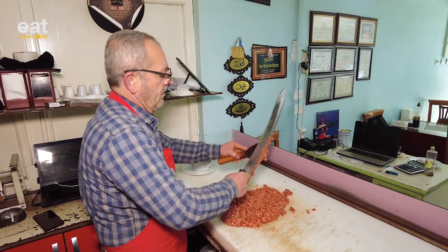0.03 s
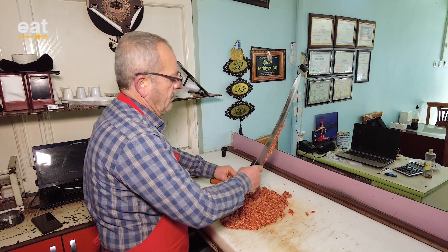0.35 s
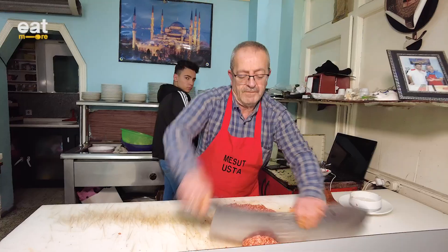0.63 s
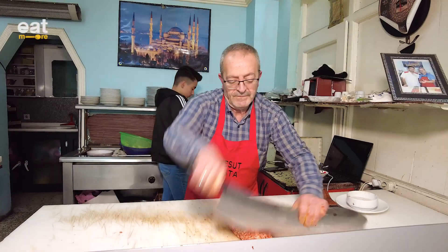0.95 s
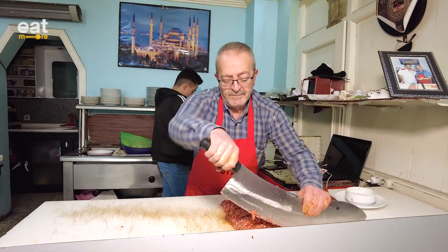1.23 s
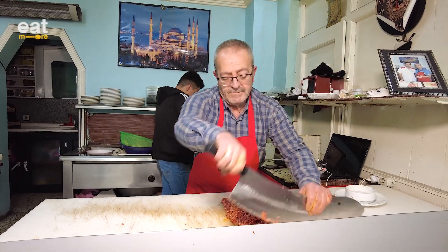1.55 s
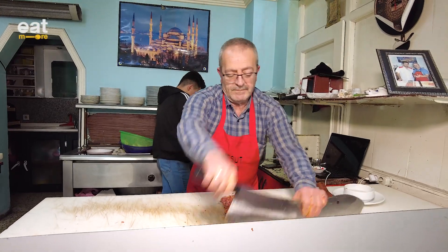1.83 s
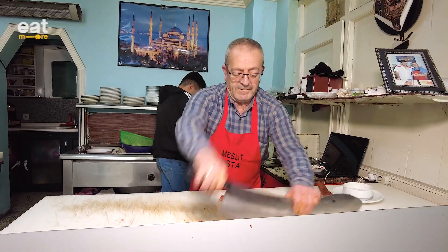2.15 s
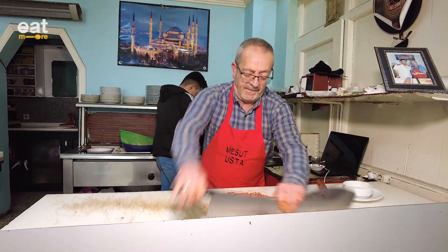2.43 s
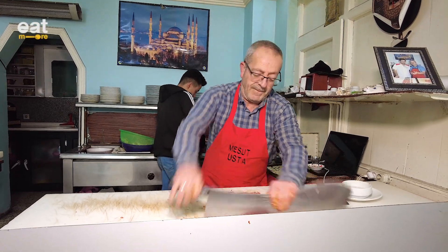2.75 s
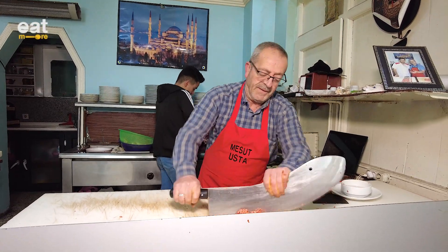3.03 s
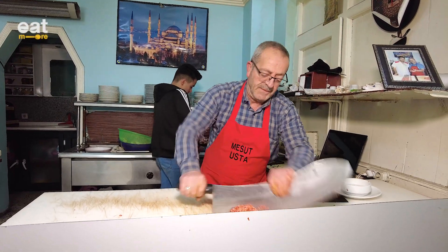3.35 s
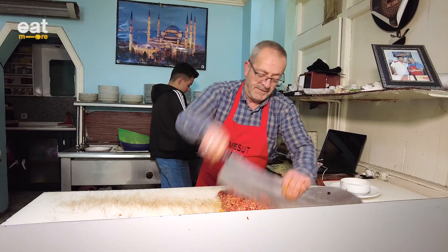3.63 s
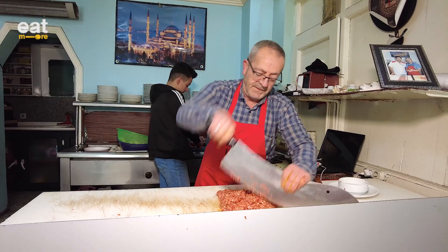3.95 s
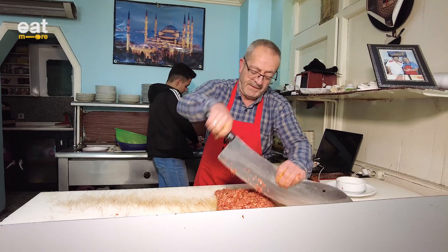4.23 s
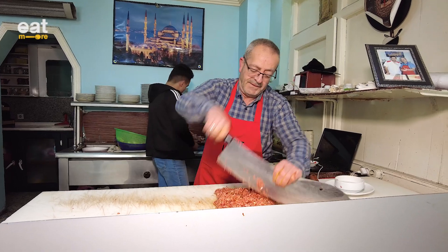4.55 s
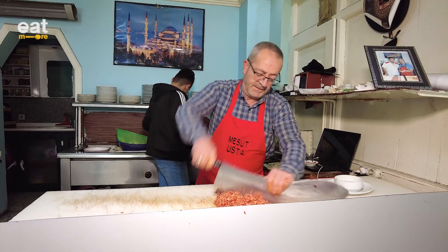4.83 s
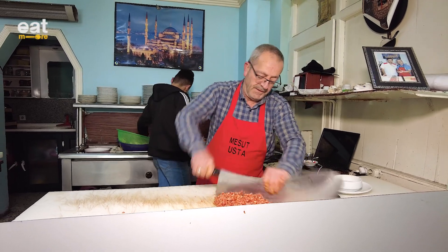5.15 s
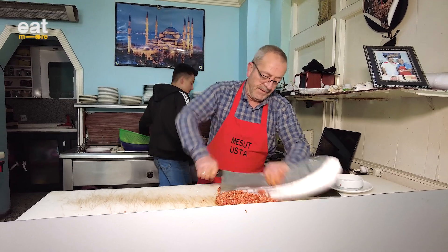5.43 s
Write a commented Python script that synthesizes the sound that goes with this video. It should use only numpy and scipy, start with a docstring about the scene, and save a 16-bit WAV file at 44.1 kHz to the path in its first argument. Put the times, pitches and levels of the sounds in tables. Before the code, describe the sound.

A short metallic scrape and clink, followed by steady cleaver knocks and moist crunches as meat is minced on a board.

```python
"""A long curved cleaver rocks through minced meat, three times a second. Each downstroke and return
crushes the wet meat and knocks the edge on a thick board, which thumps the counter under it.
Before the mincing, the blade is whetted on a steel and leaves it with a clink.
The small hard-walled kitchen adds a short tail and a low hum."""
import sys
import numpy as np
from scipy import signal
from scipy.fft import rfft, irfft
from scipy.io import wavfile
from scipy.ndimage import uniform_filter1d

SR = 44100
rng = np.random.default_rng(int(sys.argv[2]) if len(sys.argv) > 2 else 0)


def digitize_waveform(pressure):
    """Quantize a signal to 16-bit integers and store it at the path in sys.argv[1].

    Rows of a 2-D input are taken as channels; values are limited to [-1, 1].
    """
    field = np.atleast_2d(pressure).T
    bounded = np.clip(field, -1, 1)
    quanta = np.round(bounded * 32767).astype(np.int16)
    wavfile.write(sys.argv[1], SR, quanta)


N = 246959
T = np.arange(N) / SR
MINCE_START_S = .607

# Modes of board and counter. Each row: frequency in Hz, relative level in dB, t60 in seconds.
COUNTER_MODES = [(37.5, -9.5, 1), (47.5, -3.5, 0.68), (83.8, -8, 0.34), (90.6, -5.5, 0.39),
                 (105.66, 2, 0.29), (152.2, 3, 0.091), (208, -12, 0.12), (237.5, -2, 0.14), (283, -5, .15),
                 (339, -8, 0.1), (353.6, 5, 0.04), (467, 1, 0.021)]
# Modes of the steel blade. Each row: frequency in Hz, relative level in dB, t60 in seconds.
BLADE_MODES = [(1324, -5, .22), (1464, -4, .25), (2056, -3, .22), (3542, -10, .25), (4043, -7, .45),
               (4382, -3, .15), (4603, -1, .25), (5238, -2, .7), (7149, 3, .2), (7547, -6, .18),
               (7849, -4, .12)]
# Crunch spectrum. Each row: frequency in Hz, relative gain in dB.
CRUNCH_SPECTRUM = [(50, 5.5), (90, 5), (250, 5), (450, 4.5), (720, -12), (1050, -5.5), (1400, -19),
                   (1800, -25), (2300, -20), (3200, -30.5), (6000, -32.5), (12000, -54.5)]
# The blade lands and rolls along its curved edge.
# Each row: landing in seconds, roll time in seconds, thump in dB, crunch in dB.
DOWN_STROKES = [(0.7633, 0.02, -12.5, -34), (1.1086, 0.019, -15.5, -28.5), (1.444, 0.016, -15, -29.5),
                (1.7733, .017, -15, -28.5), (2.1022, 0.018, -14, -28.5), (2.427, .0175, -12.5, -27),
                (2.772, 0.0063, -7, -23.5), (3.1, 0.015, -9.5, -25), (3.447, .014, -14, -27.5),
                (3.7872, 0.014, -18, -29), (4.1301, 0.014, -14, -26.5), (4.477, .005, -15.5, -29),
                (4.8265, .021, -22, -28), (5.1579, 0.019, -18, -28), (5.5112, 0.019, -16.5, -28)]
# The blade rocks back with a dull knock, then settles on its edge.
# Each row: start in seconds, roll time in seconds, knock in dB, settling in dB.
RETURN_STROKES = [(.832, .0195, -29, -15), (1.1816, .0217, -16, -14.5), (1.532, .016, -21, -18.5),
                  (1.8677, .024, -20, -21.5), (2.197, .0235, -19, -18.5), (2.5176, .0157, -12.5, -14),
                  (2.8439, .0164, -6.5, -27), (3.1786, .0125, -9.5, -14.5), (3.5156, .019, -22.5, -13),
                  (3.8553, .0195, -19, -17.5), (4.205, .0173, -17, -12), (4.548, .018, -28, -14.5),
                  (4.895, .019, -29, -20), (5.245, .043, -19.5, -19)]


def undb(db):
    """Decibels to gain."""
    return 10 ** (np.asarray(db) / 20)


def unit(x):
    """Scale to rms 1."""
    return x / np.sqrt(np.mean(x ** 2))


def colour(x, spectrum):
    """Minimum-phase filter of unit energy, shaped by (Hz, dB) points."""
    size = 4096
    hz, db = np.transpose(spectrum)
    gain = undb(np.interp(np.log(np.fft.rfftfreq(size, 1 / SR) + 1), np.log(hz), db))
    cepstrum = irfft(np.log(gain))
    cepstrum[1:size // 2] *= 2
    cepstrum[size // 2 + 1:] = 0
    response = irfft(np.exp(rfft(cepstrum)))
    return signal.fftconvolve(x, response / np.linalg.norm(response))[:N]


def ring(x, modes):
    """Drive decaying modes; the response has unit energy."""
    t = T[:SR]
    response = sum(undb(db - 60 * t / t60) * np.sin(2 * np.pi * hz * t) for hz, db, t60 in modes)
    return signal.fftconvolve(x, response / np.linalg.norm(response))[:N]


def grains(per_s, spread_db):
    """Random tiny snaps of uneven size, rms 1."""
    size = undb(spread_db * np.clip(rng.standard_normal(N), -2, 2))
    return unit((rng.random(N) < per_s / SR) * size * rng.choice([-1, 1], N))


def swells(peaks_s, peaks_db, rise_s, fall_s):
    """Envelope with an exponential rise and fall around each peak."""
    power = np.zeros(N)
    for s, db in zip(peaks_s, peaks_db):
        near = slice(max(int((s - .5) * SR), 0), int((s + .5) * SR))
        t = T[near] - s
        power[near] += (undb(db) * np.exp(np.minimum(t / rise_s, -t / fall_s))) ** 2
    return np.sqrt(power)


def chirp(hz, fall_s):
    """Brief rough tone of unsteady pitch; rises twice as fast as it falls."""
    t = np.arange(-SR // 25, SR // 25) / SR
    jitter = unit(uniform_filter1d(rng.standard_normal(len(t)), size=int(SR / hz) + 1))
    phase = 2 * np.pi * np.cumsum(hz * (1 + .14 * jitter)) / SR
    return np.exp(np.minimum(2 * t, -t) / fall_s) * np.sin(phase)


def by_depth(s, rim_db, middle_db):
    """Level at time s as the blade works from the rim of the heap into its middle."""
    # Blade path. Each row: time in seconds, depth from 0 (rim) to 1 (middle).
    path = [(.7, 0.17), (2.2, 0), (3.3, 0.8), (5.5, 0.6)]
    depth = np.interp(s, *np.transpose(path))
    return np.interp(depth, (0, 1), (rim_db, middle_db))


def room_hum():
    """Low room noise, 3 dB louder during the mincing."""
    # Each row: frequency in Hz, relative gain in dB.
    spectrum = [(20, -14), (40, 6.5), (60, -1), (110, -10.5), (160, -14.5), (300, -18.5), (700, -26),
                (1200, -32.5), (2500, -38), (7000, -48), (10000, -59), (15500, -69.5)]
    return colour(rng.standard_normal(N), spectrum) * undb(np.where(T >= MINCE_START_S, -47, -50))


def kitchen(x, low_db=-7, high_db=-12, t60_s=.53, split_hz=600, first_echo_s=.0064):
    """Near walls return a short, bass-heavy tail; the echo pattern changes as the blade moves."""
    hop = SR // 10
    t = T[:SR // 2]
    onset = np.clip(t / first_echo_s - 1, 0, 1)
    x, out = np.pad(x, (0, 2 * hop)), np.zeros(N + SR)
    for start in range(0, N, hop):
        echoes = rng.standard_normal(len(t)) * onset * undb(-60 * t / t60_s)
        echoes /= np.linalg.norm(echoes)
        tail = 0
        for side, db in (("low", low_db), ("high", high_db)):
            band = signal.butter(1, split_hz, side, fs=SR, output="sos")
            tail = tail + undb(db) * signal.sosfilt(band, echoes)
        piece = signal.fftconvolve(x[start:start + 2 * hop] * signal.windows.cosine(2 * hop), tail)
        out[start:start + len(piece)] += piece
    return x[:N] + out[:N]


def pings():
    """Something small and metallic is touched lightly, twice."""
    # Each row: start in seconds, pitch in Hz, level in dB, t60 in seconds.
    touches = [(2.896, 9800, -54, .035), (2.914, 5780, -52, .07)]
    return sum((T >= s) * undb(db - 60 * np.abs(T - s) / t60) * np.sin(2 * np.pi * hz * (T - s))
               for s, hz, db, t60 in touches)


def wiping():
    """Between the first chops the flat of the blade swishes over the meat."""
    # Each row: peak time in seconds, level in dB.
    wipes = [(1.028, -60), (1.37, -58)]
    # Each row: frequency in Hz, relative gain in dB.
    spectrum = [(2000, -9.5), (4000, -7.5), (5200, 0), (6500, -8.5), (8000, -17.5), (15500, -33)]
    return colour(grains(6000, 2) * swells(*np.transpose(wipes), rise_s=.093, fall_s=.044), spectrum)


def counter_shudder():
    """The counter is still shuddering as the mincing comes in."""
    envelope = swells([MINCE_START_S], [-41], rise_s=.0035, fall_s=.2)
    shake = colour(grains(3300, .92) * envelope, CRUNCH_SPECTRUM)
    return shake + undb(-15.5) * ring(shake, COUNTER_MODES)


def counter_boom(force):
    """The counter booms most where it gives most under the blade."""
    # Each row: time in seconds, gain in dB.
    give = [(.85, 7), (1.3, 4), (2.3, 9), (3.1, -0.5), (3.8, 9.5), (4.35, 0.5), (4.9, 5), (5.5, -0.5)]
    return ring(force * undb(np.interp(T, *np.transpose(give))), COUNTER_MODES)


def whetting(detune=.022, wander_hz=12, clink_s=.413, bounce_s=.0063):
    """Steel slides on steel, then chatters briefly as the blade leaves it and rings."""
    # Whetting stroke. Each row: time in seconds, relative level in dB.
    stroke = [(0.0, -51), (0.03, -49.5), (0.086, -54), (0.12, -50), (0.172, -61), (0.248, -51),
              (0.346, -58.5), (0.4, -52.5), (0.41, -54)]
    # Steel and blade pressed together. Each row: frequency in Hz, relative level in dB, t60 in seconds.
    contact_modes = [(1463, -1.5, 0.21), (1980, 0, 0.061), (2525, 6.5, 0.058), (3164, 3.5, 0.078),
                     (3600, 9.5, 0.037), (5900, 6, 0.026), (7020, 7.5, 0.059), (9900, 5.5, 0.032)]
    # Each row of both: frequency in Hz, relative gain in dB.
    scrape_spectrum = [(500, -11), (1000, -31), (1500, 0.5), (3200, 0), (4500, 0.5), (7200, 0.5),
                       (9000, -4), (11000, -16), (13500, -16), (15500, -22)]
    clink_spectrum = [(600, -31), (1300, 9), (2100, 11), (2900, -7.5), (4500, 10), (6000, 3), (7300, 13.5),
                      (9000, -1), (15500, -21)]
    lift_off = np.clip((clink_s + .027 - T) / .0077, 0, 1)
    pressure = undb(np.interp(T, *np.transpose(stroke)) - 3) * lift_off
    rasp = grains(4400, 3) * pressure
    # The resonances wander as the contact travels along the blade.
    wander = unit(uniform_filter1d(rng.standard_normal(N), size=int(SR / wander_hz)))
    warped_s = T + detune * np.cumsum(wander) / SR
    singing = undb(-2) * np.interp(warped_s, T, ring(rasp, contact_modes))
    bounces = swells([clink_s, clink_s + bounce_s], [-32, -32], rise_s=.0012, fall_s=.0061)
    clink = colour(grains(9000, 1.1) * bounces, clink_spectrum)
    pluck = np.zeros(N)  # slipping off the tip plucks the free blade
    pluck[int(clink_s * SR)] = undb(-16)
    return colour(rasp, scrape_spectrum) + singing + clink + ring(pluck, BLADE_MODES)


def slicing(lead_s=.033):
    """Each downstroke first parts the top of the heap with a bright wet hiss."""
    # Each row: frequency in Hz, relative gain in dB.
    spectrum = [(1000, -9), (3000, -4.5), (7000, -0.5), (9000, -3), (11000, -13), (15500, -24)]
    s = np.transpose(DOWN_STROKES)[0] - lead_s
    envelope = swells(s, by_depth(s, -70.5, -55), rise_s=.006, fall_s=.043)
    return colour(grains(2500, 2.5) * envelope, spectrum)


def crush_peaks():
    """Hardest squeeze of each roll. Each row: time in seconds, crunch in dB, fizz in dB."""
    down = [(s + .45 * roll_s, crunch_db, crunch_db + by_depth(s, -26.5, -24.5))
            for s, roll_s, _, crunch_db in DOWN_STROKES]
    back = [(s + .75 * roll_s, -34, by_depth(s, -62, -58.5)) for s, roll_s, _, _ in RETURN_STROKES]
    return down + back


def squelches(pops=8, low_hz=1000, high_hz=8000, spread_s=.014, pop_s=.0065,
              groan_hz=1180, groan_s=.0095):
    """Pockets of juice squeeze out: a few loud squeaks, plus a groan and small pops in every stroke."""
    # Each row: peak time in seconds, pitch in Hz, level in dB, decay time in seconds.
    squeaks = [(1.772, 1300, -28, .004), (2.450, 2250, -33, .004), (2.539, 2280, -30, .003),
               (2.785, 1500, -30, .004), (2.785, 3700, -36, .003), (2.790, 2300, -30, .005),
               (3.126, 1450, -34, .005), (3.133, 2200, -33, .005)]
    # Groan of well-minced paste. Each row: time in seconds, level in dB.
    groan = [(.7, -58), (3.3, -43), (3.8, -36.5), (4.45, -38), (5.0, -48)]
    rows = list(squeaks)
    for strokes, lead_s, offset_db in ((DOWN_STROKES, .008, 0), (RETURN_STROKES, 0, -1.5)):
        for s in np.transpose(strokes)[0] - lead_s:
            rows.append((s, groan_hz, offset_db + np.interp(s, *np.transpose(groan)), groan_s))
    for s, _, fizz_db in crush_peaks():
        for when, pitch, size in rng.uniform(-.91, 1, (pops, 3)):
            hz = low_hz * (high_hz / low_hz) ** ((pitch + 1) / 2)
            db = fizz_db + 5 - 10 * pitch + 3 * size
            rows.append((s + spread_s * when, hz, db, pop_s))
    out = np.zeros(N + SR)
    for s, hz, db, fall_s in rows:
        tone = undb(db) * chirp(hz, fall_s)
        start = int(s * SR) - len(tone) // 2
        out[start:start + len(tone)] += tone
    return out[:N]


def crushing(blade_db=-19, rumble_db=-18):
    """Fibres snap and juice fizzes; the rolling blade rocks the counter and sings faintly."""
    # Each row: frequency in Hz, relative gain in dB.
    fizz_spectrum = [(700, 4), (1800, 8), (3000, -2.5), (5000, -3), (7200, 2), (9000, -11.5), (11000, -12),
                     (15500, -17)]
    s, crunch_db, fizz_db = np.transpose(crush_peaks())
    crunch = colour(grains(1100, 3.5) * swells(s, crunch_db, rise_s=.023, fall_s=.025), CRUNCH_SPECTRUM)
    fizz = colour(grains(1400, 4.2) * swells(s, fizz_db, rise_s=.018, fall_s=.015), fizz_spectrum)
    rumble = undb(rumble_db) * counter_boom(crunch)
    return crunch + rumble + fizz + undb(blade_db) * ring(fizz, BLADE_MODES)


def blows(touch_lead_s=.02, full_speed_s=.0074):
    """Edge meets board. Each row: time in seconds, thump in dB, tick in dB."""
    rows = []
    for s, roll_s, db, _ in DOWN_STROKES:
        speed_db = 20 * np.log10(min(roll_s / full_speed_s, 1))  # a short roll picks up less speed
        touch = (s - touch_lead_s, db + by_depth(s, -7.5, -7), -56)
        landing = (s, db, by_depth(s, -43, -57))
        roll_end = (s + roll_s, db + speed_db + by_depth(s, -9, .5), by_depth(s, -78, -45))
        rows += [touch, landing, roll_end]
    for s, roll_s, knock_db, settle_db in RETURN_STROKES:
        rows += [(s, knock_db, -61), (s + roll_s, settle_db, by_depth(s, -46.5, -52))]
    return rows


def board_knocks(contact_s=.00091, scatter=.095, lean=.11, boom_db=-21, knock_db=-10):
    """Each blow is a short push cushioned by meat: the board dips and springs back, the counter rings."""
    # Each row of both: frequency in Hz, relative gain in dB.
    knock_spectrum = [(200, -16.5), (460, 17.5), (700, 0.5), (1050, 2), (1500, -11.5), (2250, -20.5),
                      (3200, -21.5), (6000, -32), (12000, -58)]
    tick_spectrum = [(300, -6.5), (1000, 13), (2300, -6.5), (4000, 0), (6500, 4.5), (9000, -5.5),
                     (11000, -16.5), (15500, -42)]
    push, rows = np.zeros(N), blows()
    for s, db, _ in rows:
        near = slice(int(s * SR) - SR // 100, int(s * SR) + SR // 100)
        width_s = contact_s * np.exp(scatter * rng.standard_normal())
        u = (T[near] - s) / width_s
        push[near] -= undb(db) * (u + lean) * np.exp(-u ** 2 / 2)
    # The edge bottoms out on bare board with a hard knock and a gritty tick.
    s, thump_db, tick_db = np.transpose(rows)
    knock_envelope = swells(s - contact_s, thump_db + knock_db, rise_s=.000067, fall_s=.0028)
    tick_envelope = swells(s - contact_s, tick_db, rise_s=.0007, fall_s=.007)
    knock = colour(grains(9000, 1) * knock_envelope, knock_spectrum)
    tick = colour(grains(9000, 1) * tick_envelope, tick_spectrum)
    return push + undb(boom_db) * counter_boom(push) + knock + tick


def scene():
    """Whetting gives way abruptly to mincing, over the hum of the room."""
    shudder = counter_shudder()
    mincing = kitchen(board_knocks() + slicing() + crushing() + squelches() + wiping() + pings())
    steel = kitchen(whetting(), high_db=-10.5)
    return (np.where(T >= MINCE_START_S, mincing + shudder, steel) + room_hum())[None]


def record(dry):
    """The microphone loses the deepest bass; the recorder cuts the top."""
    low_hz, top_hz = 24, 15750
    dry = signal.sosfilt(signal.butter(2, low_hz, "high", fs=SR, output="sos"), dry)
    return signal.sosfilt(signal.ellip(10, .2, 80, top_hz, fs=SR, output="sos"), dry)


dry = scene()
out = record(dry)
digitize_waveform(out)
```